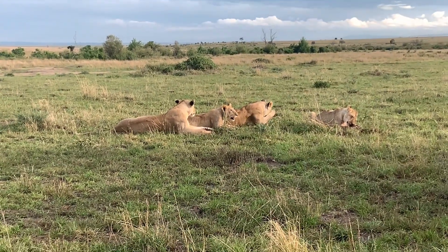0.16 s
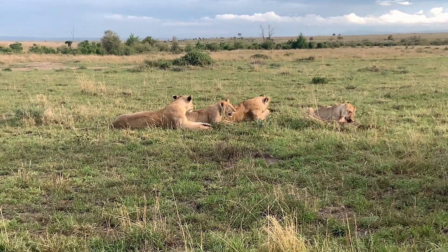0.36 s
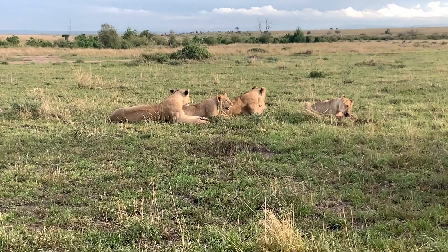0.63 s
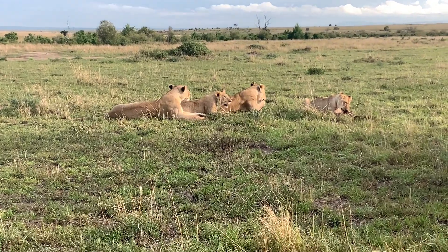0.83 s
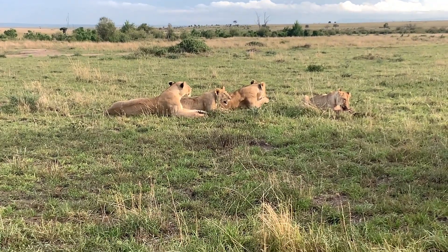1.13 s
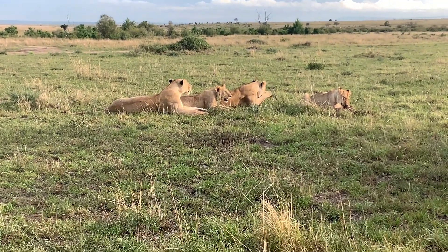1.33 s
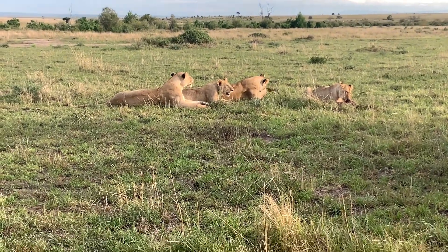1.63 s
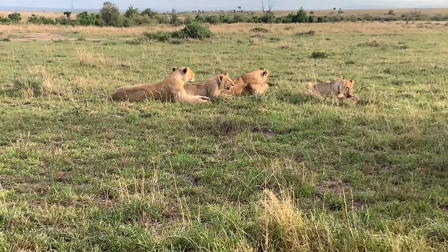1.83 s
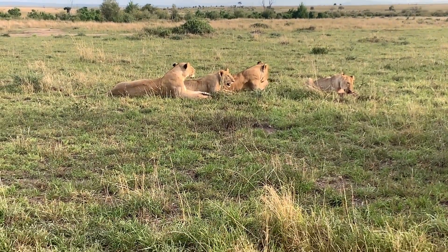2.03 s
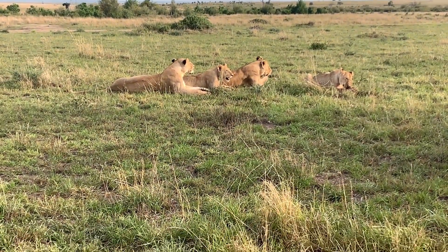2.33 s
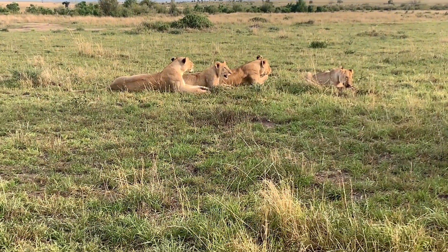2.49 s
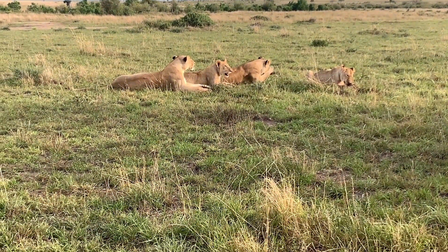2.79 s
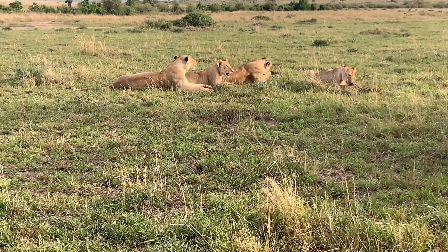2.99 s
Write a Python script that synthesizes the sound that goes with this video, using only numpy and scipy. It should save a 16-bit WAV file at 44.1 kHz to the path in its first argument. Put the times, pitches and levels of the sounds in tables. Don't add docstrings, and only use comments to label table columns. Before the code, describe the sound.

A diesel engine starts close by, slightly right, on open grassland. From 0 to 0.5 s the starter clanks and scrapes with bright metal ticks, over low uneven thumps. Around 0.55 s a heavier thump comes; by 0.9 s it catches and a low hum near 100 Hz swells. Until 3 s it idles, slowing slightly, with valve clatter, knocks, hiss, fading rattle, rumble and barely audible breeze.

```python
import sys
import numpy as np
from scipy import signal
from scipy.fft import rfft, irfft
from scipy.io import wavfile

SR = 44100
rng = np.random.default_rng(int(sys.argv[2]) if len(sys.argv) > 2 else 0)


def inscribe(sig):
    pcm = np.round(np.clip(np.atleast_2d(sig).T, -1, 1) * 32767)
    wavfile.write(sys.argv[1], SR, pcm.astype(np.int16))


def amplitude_ratio(level_db):
    exponent = np.asarray(level_db, float) / 20
    return 10 ** exponent


N = 138915
T = np.arange(N) / SR


def evened(x):
    return x / np.sqrt(np.mean(x ** 2) + 1e-20)


def read(points, hz):
    f, value = np.transpose(points)
    return np.interp(np.log(hz + 1), np.log(f + 1), value)


def colour(x, points):
    return irfft(rfft(x) * amplitude_ratio(read(points, np.fft.rfftfreq(N, 1 / SR))), N)


def coloured_noise(points):
    return evened(colour(rng.standard_normal(N), points))


def resonate(x, hz, width):
    r = np.exp(-np.pi * width / SR)
    return 2 * signal.lfilter([1 - r], [1, -r * np.exp(2j * np.pi * hz / SR)], x).real


def wander(rate_hz):
    f, phase = np.geomspace(rate_hz / 20, rate_hz, 20), rng.random(20)
    coarse = np.sin(2 * np.pi * (f * T[::64, None] + phase)) @ f ** -.5
    return evened(np.interp(T, T[::64], coarse))


def curve(table, column):
    points = np.transpose(table)
    return np.interp(T, points[0], points[column])


# (time [s], firing rate [Hz])
ENGINE_SPEED = [(.45, 24), (.63, 26.6), (.81, 30.4), (.92, 32.5), (1.15, 33.6), (1.6, 33.29), (1.8, 33.06),
                (2.2, 32.86), (2.5, 32.55), (2.9, 32.5), (3.15, 32.15)]


def firing_count():
    turns = np.cumsum(curve(ENGINE_SPEED, column=1)) / SR
    firing_at_s = 1.0061
    return turns - turns[round(firing_at_s * SR)] + 34


# (time [s], exhaust hum level [dB], clatter level [dB])
ENGINE_LOAD = [(.55, -114, -51), (.75, -56, -54.5), (.875, -77, -49.5), (.91, -32.5, -51.5),
               (1.0, -31, -52.5), (1.2, -34.5, -50.5), (1.38, -34.5, -53), (1.44, -29, -51),
               (1.49, -32.5, -52), (1.63, -28.5, -53), (2.0, -32, -54), (2.25, -30, -52.5),
               (2.4, -33, -54.5), (2.6, -30.5, -54), (2.85, -28.5, -54.5), (2.92, -34, -54),
               (3.05, -33, -52), (3.15, -33.5, -53.5)]
# (multiple of firing rate [1], level [dB], share of the load swing [0-1])
HUM_ORDERS = [(1, -26, 0.15), (2, -14, 0.13), (3, -0.5, 0.54), (4, -34.5, 0.02), (5, -25.5, 0.7),
              (6, -25, 0.15), (8, -27, 0.73)]


def exhaust_hum(turns):
    load_db = curve(ENGINE_LOAD, column=1)
    top_db = load_db.max()
    out = np.zeros(N)
    for k, db, share in HUM_ORDERS:
        level_db = top_db + db + share * (load_db - top_db) + 1.7 * wander(28)
        out += np.sqrt(2) * amplitude_ratio(level_db) * np.cos(2 * np.pi * (round(k) * turns + rng.random()))
    return out


CYLINDER_LEVELS = [1, 1, 0, 0, 1, -1]


def beats(turns, decay_s):
    rise_s, jitter_db = .003, 1.8
    count = turns.astype(int)
    jitter = np.clip(rng.standard_normal(200), -1.5, 1.5)[count]
    size_db = np.take(CYLINDER_LEVELS, count % 6) + jitter_db * jitter
    since = turns % 1 / curve(ENGINE_SPEED, column=1)
    return amplitude_ratio(size_db) * (1 - np.exp(-since / rise_s)) * np.exp(-since / decay_s) * 2


# (frequency [Hz], width [Hz], level [dB])
BLOCK_MODES = [(479, 94, -2.5), (725, 111, -1.5), (1139, 22, -13.5), (1352, 110, -4.5), (1478, 81, -4),
               (1579, 70, -6), (1743, 80, -6.5), (2007, 160, -9.5), (2195, 43, -10.5)]
# (cylinder [index], level [dB])
LATE_VALVES = [
    (1, 1.5),
    (4, -2),
]


def clatter(turns):
    valve_db = np.full(6, -60.)
    for cylinder, db in LATE_VALVES:
        valve_db[round(cylinder)] = db
    late = turns - 0.66 + 6
    fade_in = np.clip((T - .9) / 0.27, 0, 1)
    valves = amplitude_ratio(valve_db[late.astype(int) % 6]) * beats(late, decay_s=0.0051) * fade_in
    grit = rng.standard_normal(N)
    drive = (.55 + beats(turns, decay_s=.013) + .5 * valves) * grit
    ring = 0.11 * resonate(valves * grit, 1525, 99)
    for k, (f, width, db) in enumerate(BLOCK_MODES):
        ring += (-1) ** k * amplitude_ratio(db) * resonate(drive, f, width) / np.sqrt(width)
    return amplitude_ratio(curve(ENGINE_LOAD, column=2)) * evened(ring)


def strike(blows):
    out = np.zeros(N)
    for s, db, hz, t60 in blows:
        part = out[round(s * SR):][:SR // 2]
        t = T[:len(part)]
        part += amplitude_ratio(db - 60 * t / t60) * (1 - np.exp(-t / 0.0026)) * np.sin(2 * np.pi * hz * t)
    return out


# (time [s], level [dB], ring [Hz])
VALVE_KNOCKS = [(1.01, -45.5, 1355), (1.101, -45, 1550), (1.163, -45, 1450), (1.196, -45.5, 1557),
                (1.432, -47, 1310), (1.46, -47, 1567), (1.52, -45, 1700), (1.615, -49, 1307),
                (1.641, -42, 1550), (1.705, -51, 2245), (1.731, -41, 1562), (1.742, -45, 1414),
                (1.822, -44, 1550), (1.855, -46, 1528), (1.856, -57, 2000), (1.914, -55, 1540),
                (2.066, -46, 1440), (2.188, -41.5, 1550), (2.246, -54, 1330), (2.255, -44, 2200),
                (2.371, -43.5, 1550), (2.431, -45.5, 1418), (2.555, -48, 1550), (2.589, -57.5, 2050),
                (2.645, -49, 1590), (2.775, -52, 2050), (2.953, -45, 1550), (2.955, -47, 2020)]


def valve_knocks():
    t60 = 0.11
    lower = [(s, db, hz, t60) for s, db, hz in VALVE_KNOCKS]
    upper = [(s, db - 8, hz * 1.17, t60) for s, db, hz in VALVE_KNOCKS]
    return strike(lower + upper)


# (time [s], level [dB], ring [Hz], t60 [s])
EXHAUST_THUMPS = [(0.032, -39, 89.5, 0.26), (0.113, -27.5, 192, 0.17), (0.187, -36.5, 93, 0.38),
                  (0.303, -35.5, 105, 0.2), (0.377, -39, 46.6, 0.6), (0.389, -48, 126, 0.14),
                  (0.461, -30.5, 86, 0.16), (0.476, -30.5, 147, 0.21), (.49, -29, 170, 0.13),
                  (0.547, -22, 100, 0.27), (.615, -36.5, 104, 0.43), (.705, -29.5, 92, 0.17),
                  (.806, -32.5, 99, 0.19), (.81, -38, 171, 0.13), (.85, -37.5, 192, 0.22),
                  (1.117, -38, 183, 0.1), (1.42, -42, 191, 0.099), (1.53, -37, 170, .15),
                  (1.603, -34.5, 168, 0.2), (1.616, -36, 250, 0.092), (1.718, -35, 163, .12),
                  (2.999, -32.5, 188, 0.18)]


def exhaust_thumps():
    return strike(EXHAUST_THUMPS)


# (time [s], level [dB], ring [Hz], t60 [s])
PINION_BLOWS = [(.014, -38, 1750, .1), (.033, -32, 1720, .05), (.046, -29, 1580, .14),
                (.056, -27, 500, .12), (.044, -37, 590, .1), (.048, -37, 300, .2), (.052, -36, 800, .07),
                (.073, -36, 820, .06), (.058, -39, 2220, .15), (.078, -35, 1370, .08),
                (.088, -35, 1780, .1), (.085, -34, 230, .1), (.012, -39, 870, .08), (.262, -22, 1265, 0.06),
                (.262, -25, 506, 0.08), (.261, -35, 738, 0.12), (.292, -38, 1290, .07),
                (.325, -48, 3600, .07), (.268, -42, 2250, .06), (.372, -42, 2230, 0.16),
                (.365, -48, 6700, .06), (.38, -45, 4100, .1), (.382, -47, 6000, .06),
                (.382, -47, 6800, .06), (.19, -51, 4110, .05), (.589, -52, 3500, .06)]


def pinion_clanks():
    return strike(PINION_BLOWS)


# (start [s], rise [s], length [s], level [dB])
GEAR_SCRAPES = [
    (-.05, 0.11, 0.19, -34),
    (0.185, 0.0048, 0.054, -48.5),
    (0.256, 0.0067, 0.063, -34.5),
    (0.31, .006, .03, -68),
    (0.349, 0.024, 0.091, -38),
    (0.453, 0.014, 0.046, -44.5),
    (0.617, 0.014, 0.15, -50),
]
# (frequency [Hz], width [Hz], level [dB])
HOUSING_MODES = [(254, 78, 0), (505, 69, -0.5), (778, 63, 5.5), (1150, 42, -2), (1269, 10.5, -1.5),
                 (1550, 174, 4.5), (1784, 43, -7), (2217, 14.6, -1.5), (2725, 150, -3.5), (3770, 800, -0.5),
                 (4170, 160, -15), (6070, 1100, -5.5)]


def gear_scrapes():
    out = np.zeros(N)
    for s, rise, length, db in GEAR_SCRAPES:
        t = T[:SR] - s
        shape = np.clip(t / rise, 0, 1) ** 0.34 * np.clip((length - t) / (length - rise), 0, 1) ** 0.88
        grain = amplitude_ratio(0.77 * rng.exponential(1, SR // 40 + 1).repeat(40)[:SR])
        grit = evened(rng.standard_normal(SR) * grain) * shape
        tint_db = 0.5 * rng.standard_normal(len(HOUSING_MODES))
        ring = np.zeros(SR)
        for k, (f, width, mode_db) in enumerate(HOUSING_MODES):
            gain = (-1) ** k * amplitude_ratio(mode_db + tint_db[k]) * np.sqrt(SR / width / 40)
            ring += gain * resonate(grit, f, width)
        out[:SR] += amplitude_ratio(db) * (ring + amplitude_ratio(-5.5) * grit)
    return out


# (time [s], level [dB], ring [Hz])
METAL_TICKS = [
    (0.259, -40, 6760),
    (0.461, -44, 6650),
    (0.502, -48, 3400),
    (0.536, -41.5, 6700),
    (2.531, -50.5, 4860),
    (2.532, -54, 3700),
]


def metal_ticks():
    t60 = .03
    out = np.zeros(N)
    noise = rng.standard_normal(N)
    for s, db, hz in METAL_TICKS:
        snap = amplitude_ratio(db - 60 * np.clip(T - s, 0, 1) / t60) * (T > s) * noise
        out += 1.15 * snap + 2.54 * resonate(snap, hz, 630)
    return out


# (frequency [Hz], level [dB per Hz])
HISS_COLOUR = [(1500, -7.5), (2500, -1.5), (4000, -13.5), (6000, -9.5), (7800, -5.5), (9000, -6),
               (11500, 0.5), (15500, -5.5)]


def injector_hiss(turns):
    load_db = curve(ENGINE_LOAD, column=2)
    air = coloured_noise([(300, -41)] + HISS_COLOUR)
    puffs = evened(0.22 + beats(turns, decay_s=0.022))
    return amplitude_ratio(-56.5 + 0.79 * (load_db - load_db.mean())) * air * puffs


# (frequency [Hz], level [dB per Hz])
RATTLE_COLOUR = [(1200, -25), (2200, 11.5), (3800, 10), (6500, -4), (9000, 0.5)]


def cold_rattle():
    level_db = -53.5 - 5.5 * T + 1.27 * wander(31.96)
    return amplitude_ratio(level_db) * coloured_noise(RATTLE_COLOUR)


def fan():
    pitch_hz = 381 + 1.25 * wander(10)
    tone = np.sqrt(2) * amplitude_ratio(4.8 * wander(6.19)) * np.sin(2 * np.pi * np.cumsum(pitch_hz) / SR)
    return amplitude_ratio(-58) * tone * np.clip((T - .6) / 0.23, .3, 1)


# (frequency [Hz], level [dB per Hz])
RUMBLE_COLOUR = [(15, -30), (40, -36), (80, -2.5), (160, -0.5), (210, -4), (300, -11.5), (450, -21),
                 (1000, -23)]


def rumble():
    level_db = -44.5 - np.clip(1 - T / 0.48, 0, 1) + 1.5 * wander(12)
    return amplitude_ratio(level_db) * coloured_noise(RUMBLE_COLOUR + [(3000, -42.0)])


def breeze():
    level_db = -65.5 - 3 * np.clip(2 - 2 * T / 0.72, 0, 1) + 4.3 * wander(4.5)
    low = [(20, -26), (40, 9), (200, -7), (600, -36)]
    wind = np.array([colour(row, low) for row in rng.standard_normal((2, N))])
    return amplitude_ratio(level_db) * evened(wind)


# (frequency [Hz], level against the direct sound [dB])
SCATTER_COLOUR = [(150, -43), (300, -2), (800, -9), (1400, -5), (2500, 2), (4500, 3), (7000, -1),
                  (9500, -10)]


def scattered(mono):
    z = signal.stft(colour(mono, SCATTER_COLOUR), SR, nperseg=256)[2]
    phase = np.exp(2j * np.pi * rng.random((2,) + z.shape))
    return signal.istft(z * phase, nperseg=256)[1][:, :N]


# (frequency [Hz], extra lead of the right port [rad])
LAG_BEND = [(600, -.2), (900, .8), (1100, -.1), (1300, -1.4), (1750, -1.3), (2000, 0), (4500, -.8),
            (7000, 0)]
# (frequency [Hz], left minus right level [dB])
PORT_LEAN = [(250, -0.5), (750, 1.5), (1100, -3.5), (1500, 2), (2000, 5), (3000, -1), (5200, -4), (8000, 0)]


def scene():
    turns = firing_count()
    blows = exhaust_thumps() + pinion_clanks() + valve_knocks() + gear_scrapes() + metal_ticks()
    blows = signal.lfilter(*signal.butter(2, 50, "high", fs=SR), blows)
    mono = exhaust_hum(turns) + clatter(turns) + blows + injector_hiss(turns)
    mono = mono + cold_rattle() + fan() + rumble()
    hz, side = np.fft.rfftfreq(N, 1 / SR), np.array([[1], [-1]])
    port_lag_s = 0.000183
    lead = 2 * np.pi * hz * port_lag_s + read(LAG_BEND, hz)
    direct = irfft(rfft(mono) * np.exp(-.5j * lead * side), N)
    lean = amplitude_ratio(side * read(PORT_LEAN, hz) / 2)
    return irfft(rfft(direct + scattered(mono)) * lean, N) + breeze()


def low_pass(x):
    return signal.sosfilt(signal.butter(12, 16880, fs=SR, output="sos"), x)


# (low edge [Hz], high edge [Hz])
SUM_BANDS = [(7750, 8950), (13100, 13900), (15800, 22050)]
# (low edge [Hz], high edge [Hz])
DIFFERENCE_BANDS = [(10750, 11150), (15300, 22050)]
# (low edge [Hz], high edge [Hz])
HOLE_RANGE = (2350, 4900)


def record(dry):
    hz, _, z = signal.stft(np.array([dry[0] + dry[1], dry[0] - dry[1]]) / 2, SR, nperseg=1024)
    frames = z.shape[2]
    power = (abs(z[:, hz > 5000]) ** 2).sum((0, 1))
    loud = power > np.median(power) * amplitude_ratio(10)
    keep = np.ones(z.shape)
    for k, gaps in enumerate([SUM_BANDS, DIFFERENCE_BANDS]):
        for low, high in gaps:
            steps = rng.integers(-1, 2, frames // 6 + 1).repeat(6)[:frames]
            edge = low + 450 * loud * (low < 9000) + 170 * steps * (low < 14000)
            keep[k, (hz[:, None] > edge) & (hz < high)[:, None]] = 0
    spots = rng.random((len(hz) // 4 + 1, frames // 3 + 1)).repeat(4, axis=0).repeat(3, axis=1)
    inside = ((hz > HOLE_RANGE[0]) & (hz < HOLE_RANGE[1]))[:, None] & ~loud
    keep[0, inside & (spots[:len(hz), :frames] < .24)] = 0
    total, diff = signal.istft(z * keep, nperseg=1024)[1][:, :N]
    return low_pass(np.array([total + diff, total - diff]))


dry = scene()
out = record(dry)
inscribe(out)
```